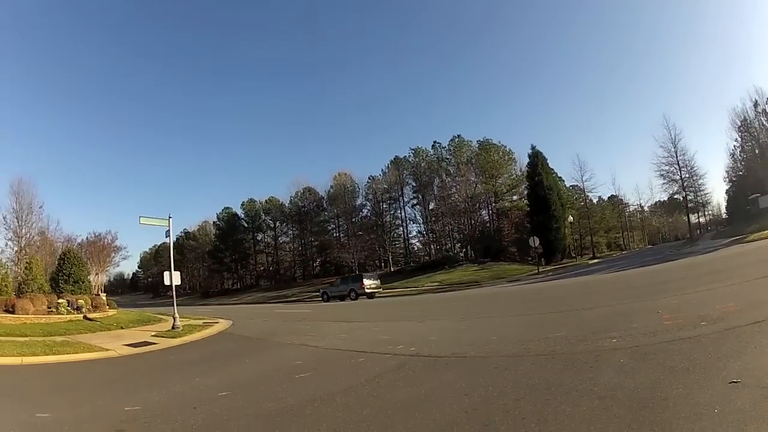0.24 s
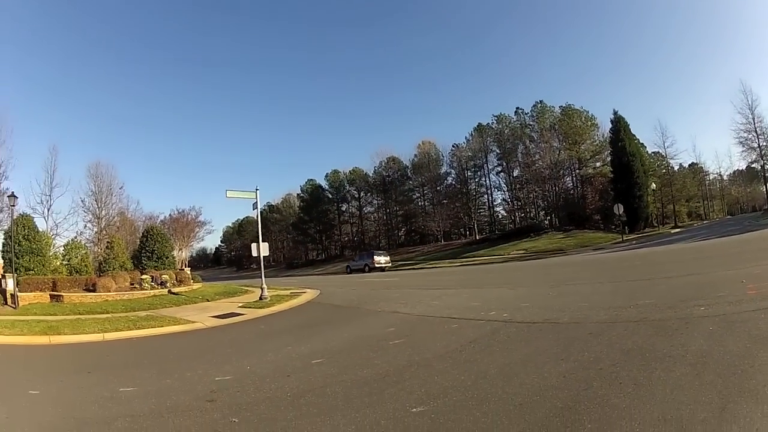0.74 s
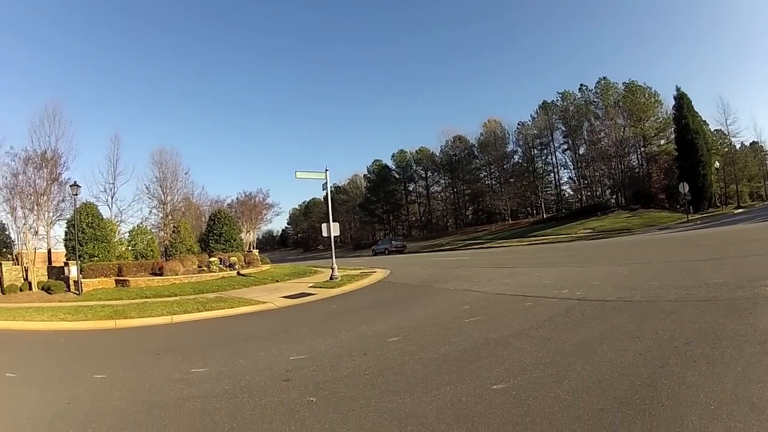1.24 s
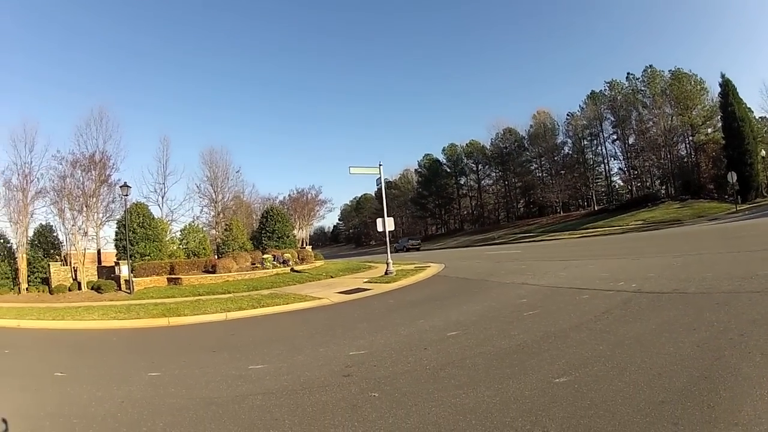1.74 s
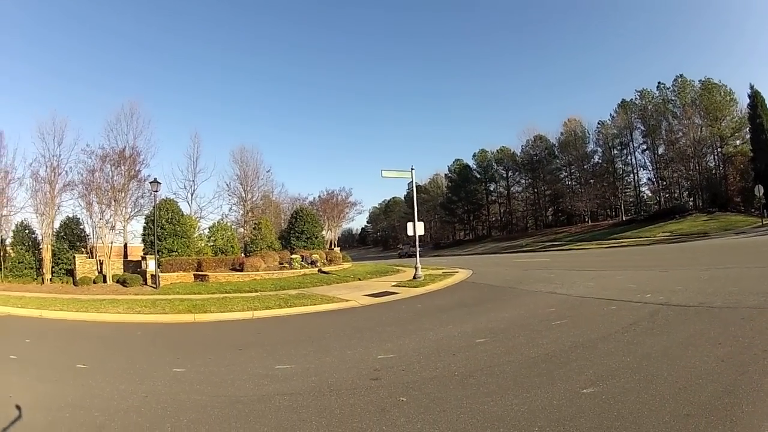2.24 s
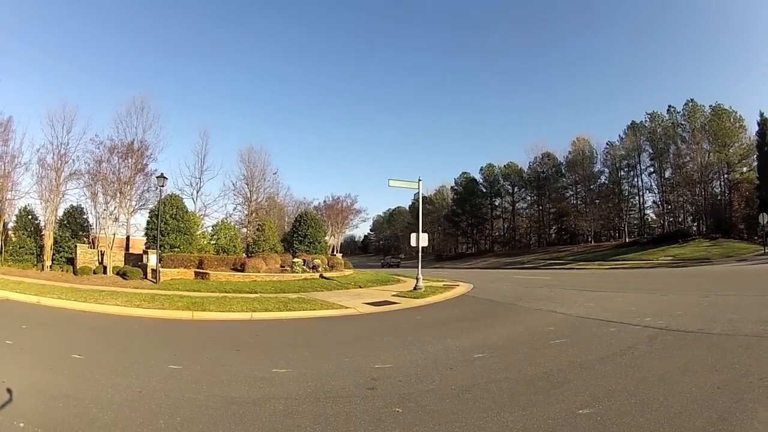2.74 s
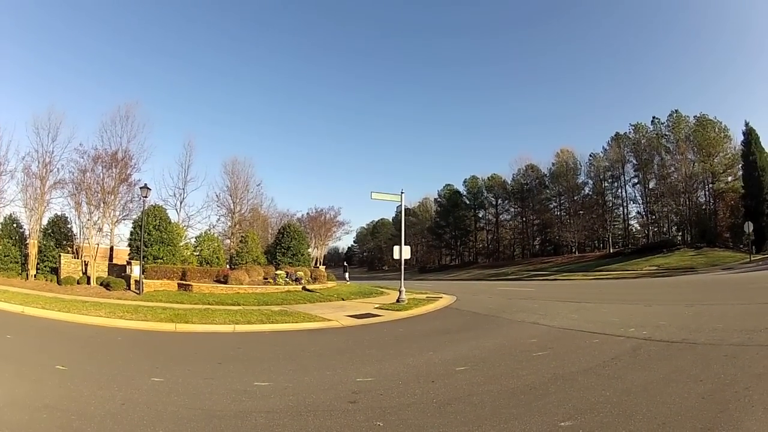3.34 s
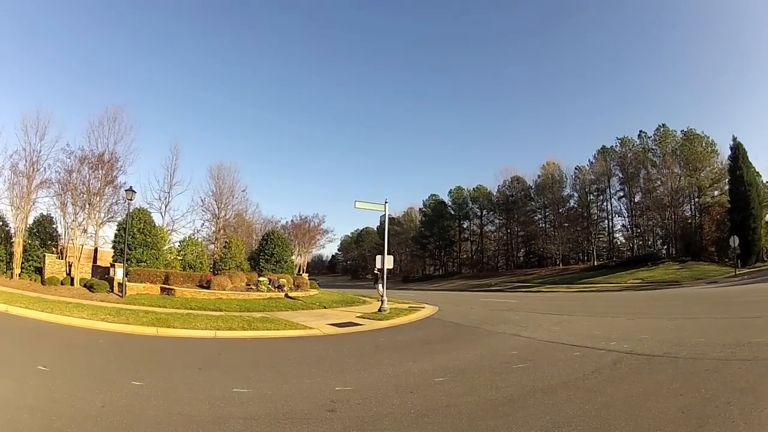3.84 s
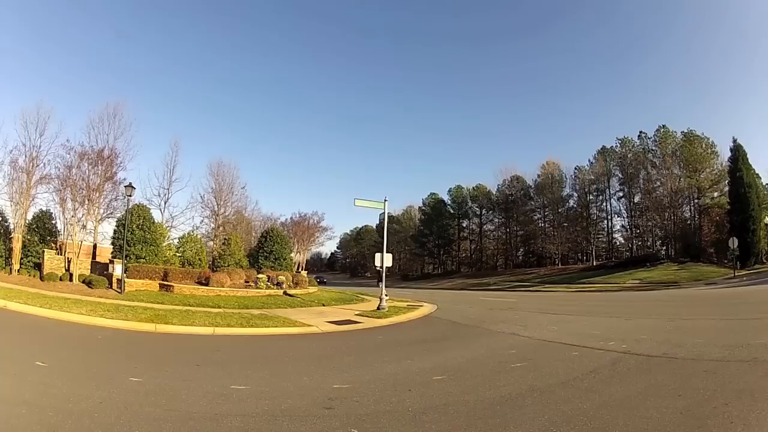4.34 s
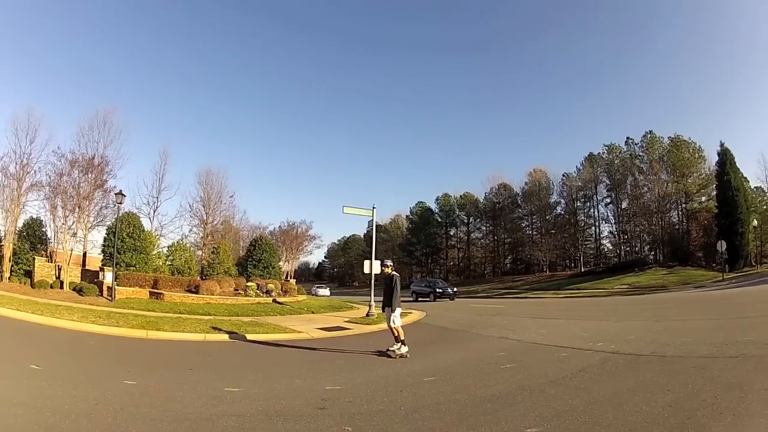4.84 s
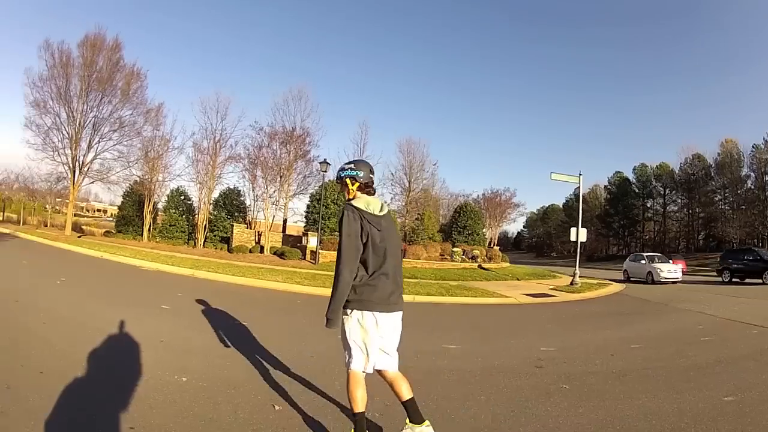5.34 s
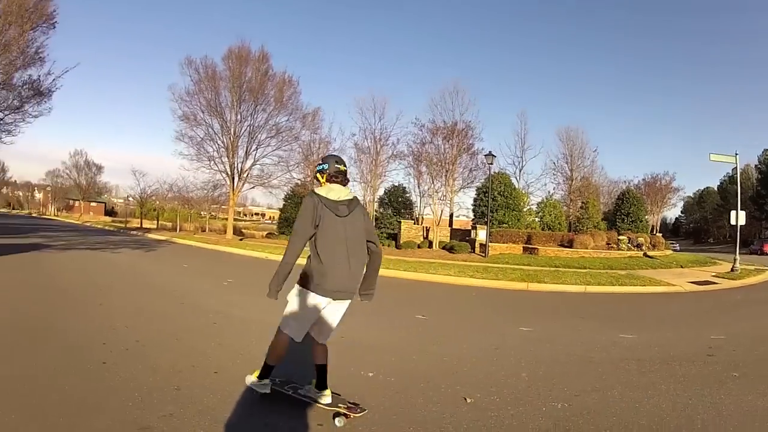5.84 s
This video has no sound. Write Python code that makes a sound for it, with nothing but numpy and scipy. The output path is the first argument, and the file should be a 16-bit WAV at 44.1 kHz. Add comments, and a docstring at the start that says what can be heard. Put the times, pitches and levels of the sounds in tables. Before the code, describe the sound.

Longboard wheels patter over asphalt with low rumble and hard cracks, dipping out four times before a second board passes close and scrubs through a carve.

```python
"""Rumble, knocks and ringing wheel noise of a longboard on asphalt, under a steady rush and thin hiss.
A second board draws close and carves past near the end; four times the sound fades out and straight back in.
The listening point is a cased camera on a pole held by the rider: noise shaped by a spectrum gives rumble and rush,
random impacts through resonators give wheels and scrubbing, and single blows and damped swings give the cracks.
Low-rate sampling with held values folds a gritty treble over everything."""
import sys
import numpy as np
from scipy import signal
from scipy.fft import rfft, irfft
from scipy.io import wavfile
from scipy.ndimage import uniform_filter1d, map_coordinates

SR = 44100
rng = np.random.default_rng(int(sys.argv[2]) if len(sys.argv) > 2 else 0)


def materialize(psi):
    """Save the field psi as 16-bit PCM at rate SR to the path in sys.argv[1].

    A 1-D psi becomes a single channel; in a 2-D psi each row is a channel.
    """
    bounded = np.clip(np.atleast_2d(psi).T, -1, 1)
    quanta = np.round(bounded * 32767).astype(np.int16)
    wavfile.write(sys.argv[1], SR, quanta)


N = 268128
T = np.arange(N) / SR  # time in s

# stretches of the ride, joined by fades; in most the wheel noise swells once, the second has almost none:
# start_s, road_db (vibration), loudest_s, fall_s (time to fall by 6 dB),
# patter_db (gritty, at its loudest), roll_db (hollow, at its loudest)
RIDE_STRETCHES = [(0, -58.5, .24, .78, -66.5, -78), (2.856, -59, 3.7, 1.0, -92, -88.5),
                  (3.857, -52, 4.47, .7, -73, -70.5), (4.623, -48, 5.05, .42, -64.5, -51.5),
                  (5.227, -48, 5.85, .32, -58, -50)]


def undb(db):
    """Logarithmic level: decibels to amplitude gain."""
    return 10 ** (np.asarray(db) / 20)


def unit(x):
    """Normalization of power: scale to rms 1."""
    return x / np.sqrt(np.mean(x ** 2))


def walk(rate):
    """Slow random fluctuation: smoothed steps drawn at `rate` per second, with spread near 1."""
    k = max(int(SR / rate), 1)
    steps = np.repeat(rng.standard_normal(N // k + 1), k)
    return 1.3 * uniform_filter1d(steps, k)[:N]


def hump(middle_s, half_s):
    """Gaussian envelope: a smooth rise and fall, 1 at its middle."""
    return np.exp(-((T - middle_s) / half_s) ** 2)


def coloured(points):
    """Spectral shaping: white noise weighted by (Hz, dB) points, then scaled to rms 1."""
    hz, db = np.transpose(points)
    f = np.maximum(np.fft.rfftfreq(N, 1 / SR), 1)
    gain = undb(np.interp(np.log(f), np.log(hz), db))
    return unit(irfft(rfft(rng.standard_normal(N)) * gain, N))


def ring(force, modes, sense=-1):
    """Modal superposition: a force drives resonances, neighbours in opposite senses (-1) or together (1)."""
    out = 0
    for k, (hz, width_hz, db) in enumerate(modes):
        b, a = signal.iirpeak(hz, hz / width_hz, fs=SR)
        out = out + sense ** k * undb(db) * signal.lfilter(b, a, force)
    return out


def cut(x, hz, kind, order=2):
    """Frequency-selective attenuation: a low-pass or high-pass filter."""
    return signal.sosfilt(signal.butter(order, hz, kind, fs=SR, output="sos"), x)


def grit(per_s, spread_db):
    """Random impulse process: dense tiny blows of varied strength."""
    hit = rng.random(N) < per_s / SR
    strength = undb(spread_db * rng.standard_normal(N))
    return hit * rng.standard_normal(N) * strength


def waver(x, share, rate):
    """Frequency modulation by varying delay: pitch wanders by a small share."""
    drift = share * walk(rate)
    position = np.arange(N) + np.cumsum(drift - drift.mean())
    return map_coordinates(x, [position], mode="mirror")


def ride():
    """Piecewise-constant excitation: the row of the ride that holds at each moment, column by column."""
    rows = np.array(RIDE_STRETCHES)
    return rows[np.searchsorted(rows[1:, 0], T)].T


def turn():
    """Stick-slip under load: gains of slip and patter build up, and both drop when the wheels grip again."""
    turn_s, hold_s = 5.56, 0.379
    slip_db, attack_db_per_s, grip_db_per_s = -48, 400, 420
    lean_db, lean_db_per_s, creep_db = -49.5, 17, -3
    # spurts in which the urethane lets go: middle_s, half_s (half length), extra_db (over the steady slip)
    spurts = [(5.635, .021, 8.5), (5.89, 0.048, 5.5)]

    after = T - turn_s - hold_s
    grip = undb(-grip_db_per_s * np.maximum(after, 0))
    attack_db = attack_db_per_s * np.minimum(T - turn_s, 0)
    spurt_db = sum(db * hump(s, half_s) for s, half_s, db in spurts)
    slip = undb(slip_db + attack_db + spurt_db)
    # patter grows as the rider leans on the wheels, and some slip creeps in with it
    lean = undb(lean_db + lean_db_per_s * np.minimum(after, 0)) * (T > RIDE_STRETCHES[-1][0])
    return grip * np.hypot(slip, lean * undb(creep_db)), grip * lean


def hiss():
    """Uncorrelated noise: thin hiss of the microphone channels, independent left and right."""
    # spectrum: frequency_hz, density_db (relative)
    spectrum = [(20, -22), (100, 13.5), (250, 18), (1000, 2), (4500, 6.5), (6000, 5)]
    return np.array([coloured(spectrum), coloured(spectrum)]) * undb(-73.5)


def rush():
    """Broadband noise: a rush of air and road whose level drifts slightly."""
    # spectrum: frequency_hz, density_db (relative)
    spectrum = [(40, -9.5), (150, -3.5), (300, -6), (550, -13), (1000, -21), (2000, -22.5), (3000, -27.5),
                (5000, -28), (6000, -29.5)]
    return coloured(spectrum) * undb(-62.0 + 0.2 * walk(3.02))


def rumble():
    """Structure-borne vibration: uneven asphalt shakes the pole, harder on rough patches, above buffeting."""
    # spectrum of the shaken pole: frequency_hz, density_db (relative)
    pole_spectrum = [(20, -22), (40, 1.5), (55, 1), (85, 1), (120, -17), (170, -22), (260, -29),
                     (500, -52.5)]
    # spectrum of the deep steady buffeting of the moving camera: frequency_hz, density_db (relative)
    buffet_spectrum = [(10, -31), (22, -15), (32, -1), (46, -0.5), (60, 0), (90, -30), (200, -46)]
    # patches of rough asphalt: middle_s, half_s (half length), level_db
    rough_patches = [(.33, .27, -50.5), (.9, 0.11, -54), (2.0, .2, -55), (2.48, .24, -48),
                     (3.17, .09, -52.5), (3.74, .07, -49.5), (4.131, 0.074, -47), (5.0, .09, -42.5),
                     (5.565, .055, -36.5), (5.7, .08, -43), (5.935, .04, -35)]

    _, road_db, *_ = ride()
    rough_power = sum((undb(db) * hump(s, half_s)) ** 2 for s, half_s, db in rough_patches)
    shake = np.sqrt(undb(road_db) ** 2 + rough_power)
    return coloured(pole_spectrum) * shake + coloured(buffet_spectrum) * undb(-56.0)


def bright_burst(at_s=6.0, half_s=0.011, db=-63):
    """Band-limited noise under a Gaussian envelope: a faint, very short burst of bright noise."""
    bright = cut(grit(per_s=3000, spread_db=4), hz=4000, kind="high")
    bright = cut(bright, hz=5950, kind="low", order=4)
    return unit(bright) * undb(db) * hump(at_s, half_s)


def clack(t, clack_db, tick_db, ping_db):
    """Impact excitation: the camera hits its mount, chatters, buzzes out and rings its case."""
    chatter, chatter_s = 0.14, 0.0045
    buzz, buzz_s = 0.0083, 0.023
    # resonances of the knocked case: frequency_hz, width_hz, level_db (relative)
    case_modes = [(370, 29, 11), (637, 76, 5.5), (802, 48, 1.5), (937, 114, 2.5), (1140, 110, -3.5),
                  (1470, 370, 4.5), (1763, 96, 4), (2434, 92, 22.5), (2490, 130, -22.5), (3370, 900, -17.5)]

    rattle = chatter * np.exp(-(t / chatter_s) ** 2) + buzz * np.exp(-t / buzz_s)
    force = rattle * cut(rng.standard_normal(len(t)), hz=740, kind="high")
    force[0] += 1  # the first blow
    # plastic yields on contact, so the blow holds little treble
    force = cut(force, hz=3300, kind="low", order=4)
    low = ring(force, case_modes[:5], sense=1)
    middle = ring(force, case_modes[5:7], sense=1)
    high = ring(force, case_modes[7:], sense=1)
    body = unit(cut(low, hz=1670, kind="low")) * undb(clack_db)
    tick = unit(cut(middle, hz=2450, kind="low")) * undb(tick_db)
    ping = unit(cut(high, hz=3220, kind="low")) * undb(ping_db)
    return body + tick + ping


def thump(t, ring_db):
    """Damped oscillation: the jolt briefly flexes the pole and leaves it swinging in its lowest mode."""
    flex_hz, peak_s = 113, 0.0076
    ring_hz, ring_s = 86, 0.027
    u = t / peak_s
    flex = np.sin(2 * np.pi * flex_hz * t) * (u * np.exp(1 - u)) ** 3
    swing = np.cos(2 * np.pi * ring_hz * t) * (1 - np.exp(-u)) ** 2 * np.exp(-t / ring_s)
    return flex + undb(ring_db) * swing


def bumps():
    """Transient superposition: each crack in the road adds a clack of the case and a thump of the pole."""
    # cracks and bumps: start_s, ping_db, thump_db, clack_db, tick_db,
    # ring_db (after-ring of the pole, relative to the thump)
    cracks = [(0.1298, -85, -41, -71, -81.5, -6), (0.704, -54, -18.5, -42.5, -43.5, -11.5),
              (1.0923, -86.5, -50, -84, -79.5, -8), (1.8904, -81, -46.5, -71.5, -75.5, 7.5),
              (2.1763, -66, -37, -60, -57, -6), (2.2398, -85, -36.5, -71, -82, -23),
              (2.3386, -90.5, -41.5, -81.5, -83.5, -8), (2.4254, -78, -43.5, -72, -73.5, -22),
              (2.4431, -78, -44, -70, -78, -4), (2.6304, -81, -41, -74.5, -77, -22),
              (2.6613, -88, -49.5, -69.5, -78.5, -9), (2.6741, -82, -49.5, -74, -71.5, -1),
              (2.7751, -78.5, -34, -63.5, -68.5, -1.5), (3.5307, -91, -51, -77.5, -78, -15),
              (4.265, -57.5, -31, -49.5, -56, 4.5), (5.2691, -73, -39.5, -64.5, -74, -9),
              (5.8086, -46, -24, -43, -48.5, -20)]
    t = T[:SR // 5]
    out = np.zeros(N + len(t))
    for s, ping_db, thump_db, clack_db, tick_db, ring_db in cracks:
        i = int(s * SR)
        knock = clack(t, clack_db, tick_db, ping_db)
        out[i:i + len(t)] += knock + undb(thump_db) * thump(t, ring_db)
    return out[:N]


def wheels():
    """Resonance under random impacts: stones ring the wheels, louder as they come near; the ring wavers."""
    # broad resonances of stones pattering on the wheels: frequency_hz, width_hz, level_db (relative)
    patter_modes = [(732, 220, -4), (1350, 1190, 0), (1710, 1360, 0), (2600, 440, -4), (3540, 530, -27)]
    # resonances of plain rolling: frequency_hz, width_hz, level_db (relative)
    roll_modes = [(933, 110, -8), (1520, 230, -3.5), (1852, 184, 2.5), (2180, 200, -11.5), (2533, 86, -3),
                  (4150, 130, -19)]

    _, _, loudest_s, fall_s, patter_db, roll_db = ride()
    near = 1 / (1 + ((T - loudest_s) / fall_s) ** 2)
    _, lean = turn()
    patter = cut(ring(grit(per_s=6300, spread_db=1.0), patter_modes), hz=3480, kind="low")
    roll = cut(ring(grit(per_s=6000, spread_db=1.5), roll_modes), hz=3360, kind="low")
    roll = cut(roll, hz=595, kind="high")
    roll = waver(roll, share=.018, rate=25)
    patter_gain = np.hypot(near * undb(patter_db), lean)
    return unit(patter) * patter_gain + unit(roll) * near * undb(roll_db)


def carve():
    """Stick-slip friction: in the turn the urethane grips and slips in short spurts."""
    # resonances of wheels scrubbing in a turn: frequency_hz, width_hz, level_db (relative)
    scrub_modes = [(152, 18.6, 0), (368, 18, -7.5), (614, 59, -5), (932, 83, 1), (1194, 186, -3.5),
                   (1640, 190, -16), (2380, 60, -19.5)]
    slip, _ = turn()
    scrub = cut(ring(grit(per_s=3500, spread_db=2), scrub_modes), hz=3300, kind="low")
    flicker = undb(1.3 * walk(100))
    return unit(scrub) * slip * flicker


def scene():
    """Linear superposition: one sound in the middle; only the hiss differs between left and right."""
    background = hiss() + rush() + rumble()
    return background + bright_burst() + bumps() + wheels() + carve()


def record(dry):
    """Sample-and-hold imaging: slow sampling with held values mirrors sound into a gritty treble; then fades."""
    audio_hz, top_hz, fade_s = 12000, 15100, 0.098
    slow = signal.resample(dry, N * audio_hz // SR, axis=1)
    # a gentle roll-off just under half the slow sampling rate, with unit gain at 0 Hz
    pole = 0.67
    slow = signal.lfilter([1, .92], [1, pole], slow) * (1 + pole) / 1.92
    # each value is held for four steps
    held = signal.resample(np.repeat(slow, 4, axis=1), N, axis=1)
    # silence at each join between stretches, with straight ramps on both sides
    to_join_s = np.min([np.abs(T - s) for s, *_ in RIDE_STRETCHES[1:]], axis=0)
    fade = np.clip(to_join_s / fade_s, 0, 1)
    return signal.sosfilt(signal.ellip(8, .2, 70, top_hz, fs=SR, output="sos"), held * fade)


dry = scene()
out = record(dry)
materialize(out)
```